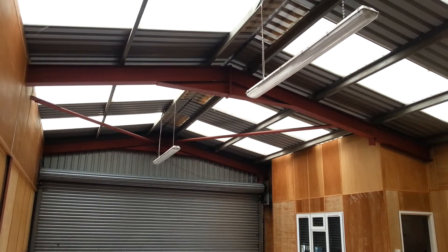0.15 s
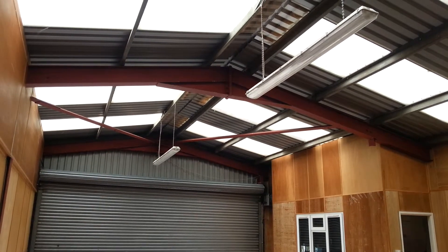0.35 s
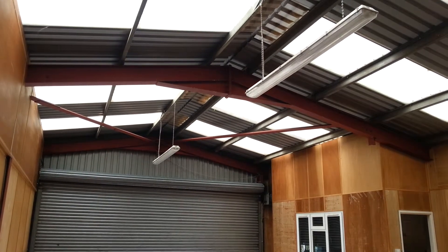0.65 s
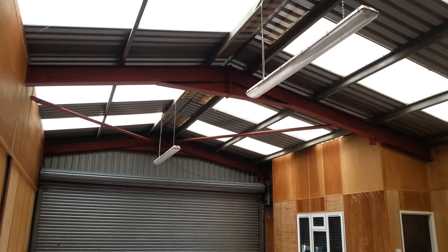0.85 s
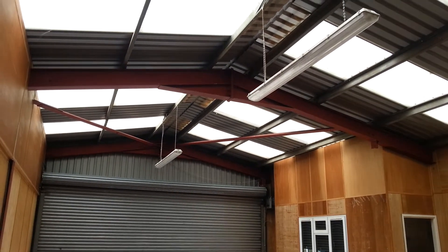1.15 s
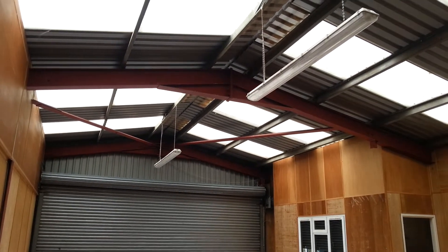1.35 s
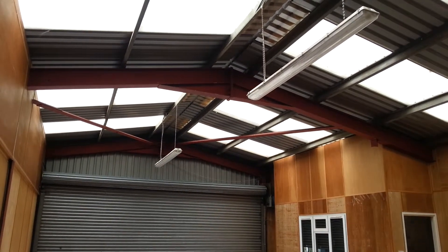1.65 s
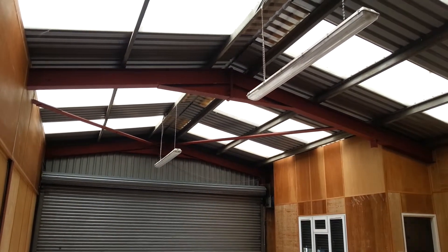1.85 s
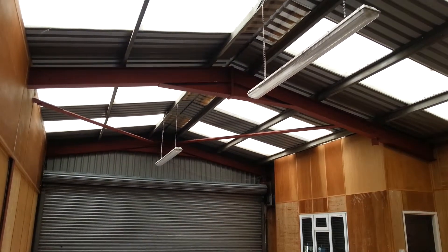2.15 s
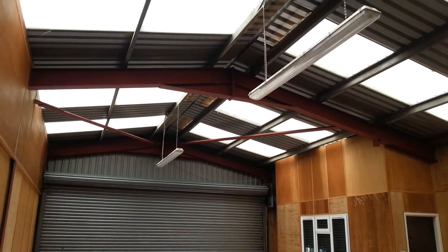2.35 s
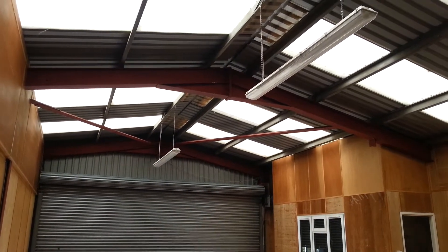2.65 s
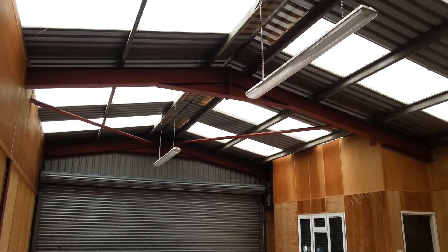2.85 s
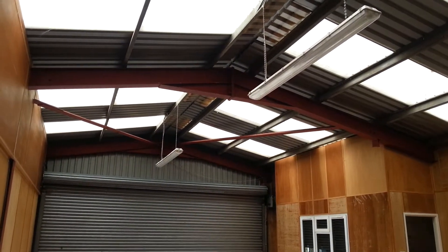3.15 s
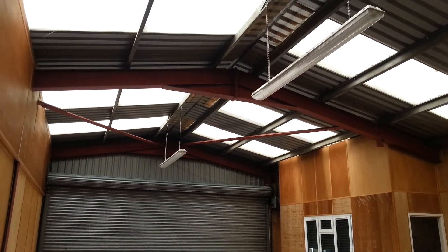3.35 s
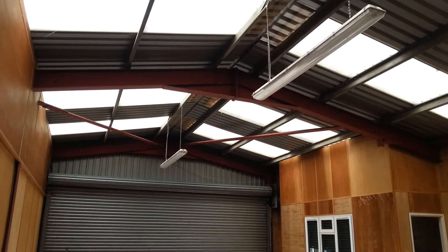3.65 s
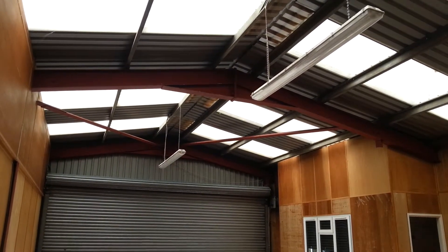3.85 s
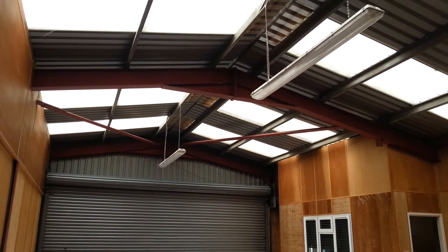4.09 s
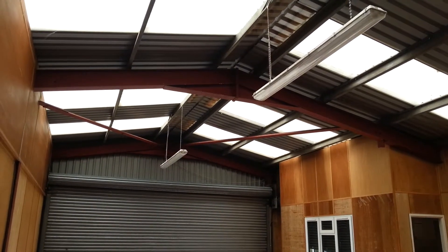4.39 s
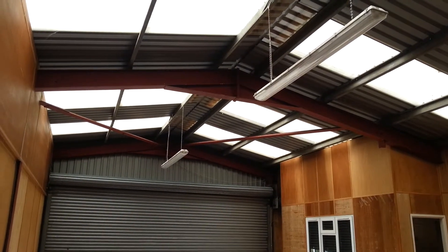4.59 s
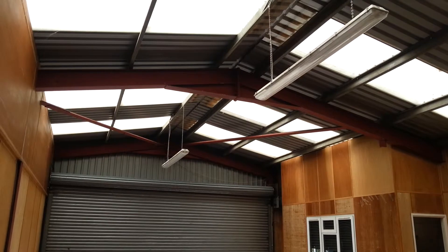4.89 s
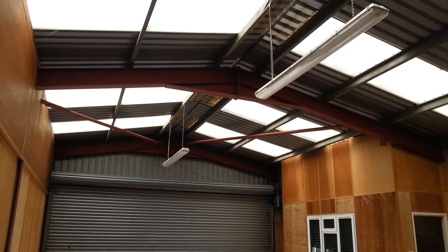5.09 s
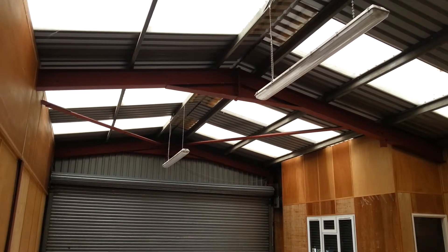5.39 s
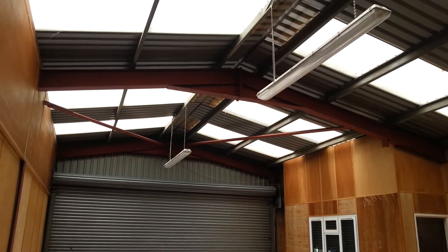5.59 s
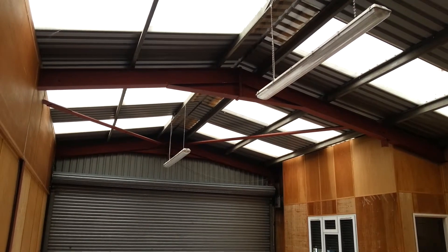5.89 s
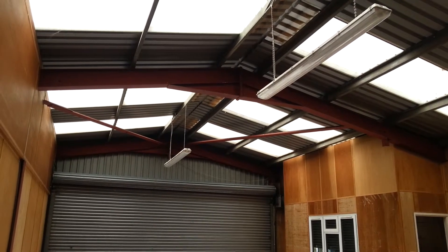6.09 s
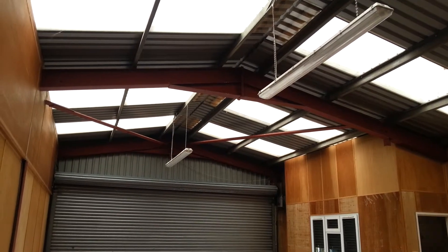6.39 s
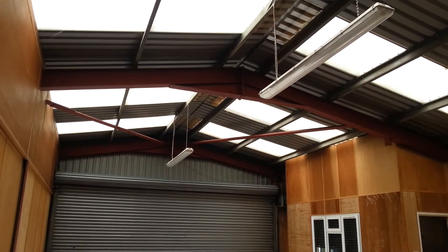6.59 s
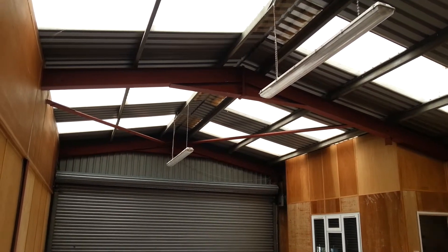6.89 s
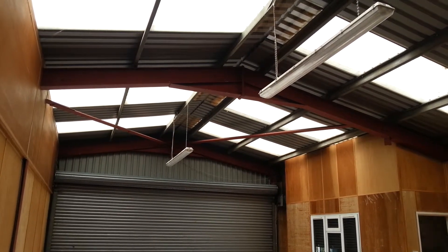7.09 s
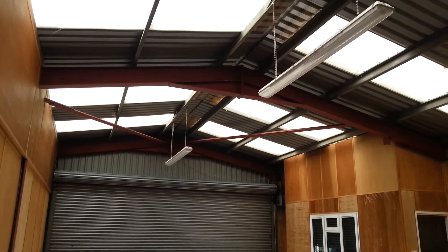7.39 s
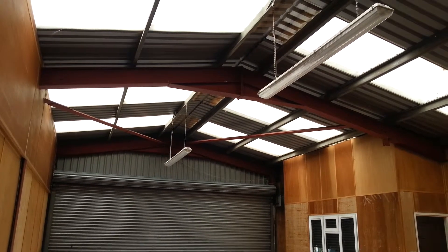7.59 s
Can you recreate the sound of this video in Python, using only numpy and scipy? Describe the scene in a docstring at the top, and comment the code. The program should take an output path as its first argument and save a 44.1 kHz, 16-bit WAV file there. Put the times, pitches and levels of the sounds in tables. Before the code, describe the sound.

Inside a large, empty steel and timber shed, a steady bed of faint distant rumble and microphone hiss runs throughout. From 0 to about 3.4 seconds a nearby swallow-like bird twitters quickly: tiny sliding whistles and scooped chirps, mostly 3 to 6 kHz, strongest from about 1.3 to 2.3 seconds, blurred into a long shimmer by the hall. At about 2.5 seconds the sheet roof gives a quiet dull knock, and again at 3.9. After a short lull, a softer song begins near 3.75, pauses briefly, then builds from 4.6 to 5.8 with regular pulses, high rising flicks over lower held notes, loudest around 5.1 to 5.5. A thin, wavering far whistle, mostly echo, sits behind it from 4.6 to 5.4. After another gap, a weaker song runs from 6.3 to the end near 7.7 seconds, becoming sparse and gentle.

```python
"""Songbirds twitter, swallow-like, in the roof of a large empty shed, over distant rumble and microphone hiss.
A near song opens the scene: short sliding whistles, near-sines smeared into a long shimmer by the hall.
During and after it the sheet roof knocks twice, each knock a coloured, decaying noise burst.
Two softer songs follow, pairing an upper voice of rising flicks with a lower voice of held notes.
Among them a far bird whistles outside: a thin wavering tone heard mostly as echo."""
import sys
import numpy as np
from scipy import signal
from scipy.fft import rfft, irfft
from scipy.io import wavfile
from scipy.ndimage import uniform_filter1d

SR = 44100
rng = np.random.default_rng(int(sys.argv[2]) if len(sys.argv) > 2 else 0)


def materialize(psi):
    """Save the field psi as 16-bit PCM at rate SR to the path in sys.argv[1].

    A 1-D psi becomes a single channel; in a 2-D psi each row is a channel.
    """
    bounded = np.clip(np.atleast_2d(psi).T, -1, 1)
    quanta = np.round(bounded * 32767).astype(np.int16)
    wavfile.write(sys.argv[1], SR, quanta)


N = 341334


def gain_of(db):
    """Level law: amplitude is ten to the power of decibels over twenty."""
    return 10 ** (np.asarray(db) / 20)


def evened(x):
    """Power normalisation: scales a signal to rms 1."""
    return x / np.sqrt(np.mean(x ** 2) + 1e-20)


def read(points, hz):
    """Logarithmic pitch scale: interpolates a table along log frequency."""
    table_hz, value = np.transpose(points)
    return np.interp(np.log(hz + 1), np.log(table_hz + 1), value)


def add(mix, s, sound):
    """Superposition: adds a sound to the mix from time s, in seconds."""
    part = mix[..., max(round(s * SR), 0):][..., :sound.shape[-1]]
    part += sound[..., :part.shape[-1]]


def wander(count, smooth):
    """Low-passed noise: two running means over `smooth` samples leave a slow fluctuation of rms 1."""
    size = max(int(smooth), 2)
    noise = rng.standard_normal(count)
    return evened(uniform_filter1d(uniform_filter1d(noise, size), size))


# Spectrum of the rumble and hiss. Each row: frequency in Hz, relative level in dB per Hz.
AIR_SPECTRUM = [(21, -48), (45, -7.5), (109, -15), (185, -1.5), (356, 0), (561, -2.5), (778, 0.5),
                (1030, -3), (2080, -10), (3110, -9.5), (4660, -7), (6470, -11), (8980, -14), (13400, -15.5),
                (14500, -15)]
# Coherence of the two microphones in the air. Each row: frequency in Hz, left-right likeness (0 to 1).
AIR_COHERENCE = [(50, 0.12), (300, 0.6), (1000, 0.15), (4000, 0.014)]
AIR_DB = -50.5  # before a small lift for each side


def air():
    """Diffuse background noise: random short-time spectra, partly coherent, with faint drifting patches."""
    frames, hz = N // 256 + 5, np.fft.rfftfreq(1024, 1 / SR)
    a, b, c, d, patches = rng.standard_normal((frames, 513, 5)).T
    patches = evened(uniform_filter1d(uniform_filter1d(patches, 12, 0), 20, 1))
    swell_db = 0.4 * wander(frames, 60)
    likeness = np.clip(read(AIR_COHERENCE, hz), -1, 1)[:, None]
    left = a + 1j * b
    right = likeness * left + np.sqrt(1 - likeness ** 2) * (c + 1j * d)
    spectra = np.array([left, right])
    spectra *= gain_of(read(AIR_SPECTRUM, hz)[:, None] + 1.58 * patches + swell_db)
    noise = signal.istft(spectra, nperseg=1024, noverlap=768)[1][:, :N]
    return gain_of([[AIR_DB + 0.5], [AIR_DB + 2.5]]) * evened(noise)


# Straight slides, mostly of the near song.
# Each row: start in seconds, length in seconds, start pitch in Hz, end pitch in Hz, level in dB.
SLIDES = [(0.0, 0.0031, 3680, 5580, -30), (.139, 0.027, 4230, 6140, -32.5), (.235, 0.031, 3740, 6040, -33),
          (.328, 0.012, 5770, 5010, -31), (.353, 0.013, 5300, 5980, -24.5),
          (.418, 0.037, 5050, 4760, -34.5), (.456, 0.025, 3265, 4740, -29),
          (.471, 0.0056, 5100, 5730, -22.5), (.474, 0.01, 6370, 6620, -36.5),
          (.478, 0.0095, 4490, 4840, -21.5), (.548, 0.031, 4230, 4575, -23),
          (.566, 0.0046, 4840, 7700, -30.5), (.684, 0.042, 3390, 3720, -42.5),
          (.722, 0.012, 3424, 4590, -24.5), (.732, 0.012, 4900, 5670, -26), (.79, .03, 3860, 4420, -31.5),
          (.8, 0.017, 5320, 5400, -30), (.822, 0.0084, 5400, 7380, -34), (.856, 0.01, 5030, 4760, -28),
          (.874, 0.026, 4264, 4266, -32), (1.078, 0.0407, 4300, 3726, -35),
          (1.118, 0.022, 3400, 4596, -26.5), (1.186, 0.039, 4750, 4920, -34.5),
          (1.216, 0.015, 5060, 5555, -24), (1.338, 0.027, 3233, 5500, -23.5),
          (1.36, 0.0091, 5580, 5460, -15.5), (1.428, 0.029, 4680, 5056, -22),
          (1.444, 0.017, 4914, 5580, -17.5), (1.688, .02, 3654, 4800, -18.5), (1.7, 0.017, 4668, 4690, -18),
          (1.79, .008, 4320, 4600, -22.5), (1.856, .031, 3170, 3800, -36),
          (1.872, 0.0095, 2450, 2630, -32.5), (1.91, 0.014, 4820, 5180, -36.5),
          (1.986, 0.019, 3420, 4090, -33.5), (2.012, 0.036, 3895, 4550, -27),
          (2.04, 0.014, 4550, 4910, -23.5), (2.139, 0.023, 3564, 3754, -26.5),
          (2.157, .016, 3686, 4785, -16), (2.164, 0.017, 4570, 4605, -17), (2.198, 0.026, 4860, 5230, -24),
          (2.252, 0.0091, 1810, 2630, -31.5), (2.328, 0.031, 3875, 4960, -32),
          (2.352, 0.0075, 3360, 3676, -20.5), (2.556, 0.015, 3310, 3360, -34),
          (2.57, 0.015, 4330, 4310, -31), (2.596, 0.024, 4330, 5030, -28.5),
          (2.606, 0.012, 4780, 5300, -32), (2.684, 0.019, 2940, 3100, -41),
          (2.706, 0.0083, 3170, 3570, -30.5), (2.72, 0.022, 4364, 4465, -24.5),
          (2.722, 0.011, 2130, 2290, -41), (2.735, 0.012, 4880, 7100, -29), (2.737, 0.014, 3000, 3200, -39),
          (2.745, 0.013, 6150, 6450, -50), (2.785, 0.014, 4090, 3520, -30), (2.79, .034, 4950, 4360, -30),
          (2.836, .018, 2842, 4510, -25), (2.846, 0.0068, 5250, 4950, -30.5),
          (2.994, 0.024, 3003, 4110, -31), (3.013, .0064, 4650, 4370, -26), (3.014, 0.024, 4156, 3820, -25),
          (3.03, 0.022, 4320, 5320, -27), (3.178, 0.023, 1990, 2650, -41.5),
          (3.18, 0.041, 3750, 5060, -34.5), (3.208, 0.017, 4940, 5730, -40),
          (3.246, 0.02, 3800, 4200, -27.5), (3.258, .02, 4110, 3794, -23), (3.252, .004, 3030, 3330, -29),
          (3.34, 0.0092, 3550, 3350, -43), (3.355, 0.029, 5850, 5500, -34), (3.374, 0.02, 2800, 2840, -41),
          (3.384, 0.017, 2200, 2760, -41), (3.388, 0.033, 4550, 5350, -31.5),
          (3.408, 0.014, 5860, 6500, -39.5), (3.41, 0.01, 2890, 3780, -34.5),
          (3.411, 0.0046, 6800, 7650, -38), (3.42, 0.018, 5110, 4310, -31),
          (3.898, 0.0085, 5340, 5700, -43), (4.681, .014, 5200, 5800, -57), (4.973, 0.023, 5400, 4370, -40),
          (5.232, 0.014, 4250, 6640, -30), (6.298, 0.028, 5500, 5930, -54), (6.391, .013, 5200, 5800, -52),
          (6.447, 0.025, 5350, 4580, -45), (6.563, 0.0099, 5200, 5440, -45), (7.595, .027, 5200, 4700, -51),
          (7.718, 0.012, 4930, 5020, -44), (7.731, 0.011, 3900, 4100, -36)]
# Hooks of the near song, scooping up to a held pitch.
# Each row: start in seconds, length in seconds, held pitch in Hz, level in dB.
HOOKS = [(0.252, 0.038, 4410, -35), (0.572, 0.015, 5120, -18.5), (0.817, 0.015, 4920, -17.5),
         (1.12, 0.01, 5390, -37), (1.223, 0.014, 4200, -30.5), (1.362, 0.0083, 3970, -24.5),
         (1.45, 0.012, 4420, -22.5), (1.519, 0.0036, 3774, -21), (1.547, 0.0067, 3724, -19.5),
         (1.728, 0.0097, 4094, -15), (1.729, 0.017, 5155, -19), (1.78, 0.023, 3550, -28.5),
         (1.885, 0.0045, 3330, -21), (2.042, .014, 3677, -19), (2.195, 0.011, 4038, -15),
         (2.267, 0.0097, 3542, -20.5), (2.579, 0.032, 4054, -25.5), (2.804, 0.015, 4144, -22.5),
         (3.173, 0.0243, 3453, -32), (3.274, .012, 4570, -21.5)]
SLIDE_MIDWAY = 0.55  # share of the slide done at half length
HOOK_SCOOP, HOOK_MIDWAY = 0.1675, 0.98  # starts this share below the held pitch; share reached at half length


def near_song():
    """Frequency modulation: slides move between two pitches, hooks scoop up and level off."""
    notes = []
    for s, length, start_hz, end_hz, db in SLIDES:
        middle_hz = start_hz + SLIDE_MIDWAY * (end_hz - start_hz)
        notes.append((s, 1, length, start_hz, middle_hz, end_hz, db))
    for s, length, held_hz, db in HOOKS:
        notes.append((s, 1, length, held_hz * (1 - HOOK_SCOOP), held_hz * HOOK_MIDWAY, held_hz, db))
    return notes


def song():
    """Succession: all notes in order as (s, rasp, length s, start Hz, middle Hz, end Hz, level dB)."""
    return sorted(near_song() + upper_voice() + lower_voice())


SWELL = 1.22  # over 1: a note peaks late and stops short


def note(length, start_hz, middle_hz, end_hz, level_db, rasp):
    """Syrinx oscillation: a sliding near-sine with a faint octave, fluttering a little in level and pitch."""
    u = np.arange(round(length * SR)) / (length * SR)
    # parabola through the start, middle and end pitches
    hz = start_hz * (1 - u) * (1 - 2 * u) + middle_hz * 4 * u * (1 - u) + end_hz * u * (2 * u - 1)
    phase = 2 * np.pi * np.cumsum(hz * (1 + 0.003 * rasp[:len(u)])) / SR
    tone = np.sin(phase) + gain_of(-47.0) * np.sin(2 * phase)
    flutter_db = np.minimum(2.2 * rasp[::-1][:len(u)], 4)
    envelope = np.sin(np.pi * u ** SWELL) ** 0.6
    return gain_of(level_db + flutter_db) * tone * envelope


def sum_tones(voices, level_db=-27.5, low_hz=7070.0):
    """Quadratic intermodulation: voices together shake each other and add a faint tone at their summed pitch."""
    power = uniform_filter1d(voices ** 2, size=200)
    mixed = voices ** 2 / np.sqrt(np.abs(power) + 1e-9)  # keeps the level in proportion to the voices
    high_pass = signal.butter(6, low_hz, "high", fs=SR, output="sos")
    return gain_of(level_db) * signal.sosfilt(high_pass, mixed)


# Reverberation of the steel and timber hall. Each row: frequency in Hz, 60 dB decay time in seconds.
HALL_DECAY = [(300, 0.4), (2000, 0.78), (4000, 0.81), (6500, 0.5), (12000, 0.94)]


def hall(x, near_s=0.0094, early_db=6.0, delay_s=0.002):
    """Reverberation: sparse reflections of random sign, stronger at first, each band dying at its own speed."""
    taps = np.zeros((2, SR))
    # one reflection at a random place in every 20 samples, for each ear
    at = np.arange(0, SR - 20, 20) + rng.integers(0, 20, (2, (SR - 1) // 20))
    np.put_along_axis(taps, at, rng.choice([-1., 1.], at.shape), 1)
    hz, t, z = signal.stft(taps, SR, nperseg=256)
    decay_db = -60 * t / read(HALL_DECAY, hz)[:, None] + early_db * np.exp(-t / near_s)
    tail = signal.istft(z * gain_of(decay_db), SR, nperseg=256)[1]
    tail = np.pad(tail, ((0, 0), (int(delay_s * SR), 0)))
    return signal.fftconvolve(x[None], tail / np.linalg.norm(tail[0]), axes=1)[:, :N]


# Echoes of each note from the nearest roof sheets and beams.
# Each row: left delay in seconds, right delay in seconds, level in dB.
NEAR_ECHOES = [(.0042, .0031, -6), (0.0119, .0098, -11.5)]


def near_echoes(direct):
    """Specular reflection: delayed, weaker copies reach each ear after its own path."""
    echoes = np.zeros_like(direct)
    for *delays, db in NEAR_ECHOES:
        copies = [np.roll(ear, int(delay * SR)) for ear, delay in zip(direct, delays)]
        echoes += gain_of(db) * np.array(copies)
    return echoes


# Direct sound of the birds at the two microphones.
# Each row: frequency in Hz, level at the left above the right in dB.
DIRECT_SIDE = [(2500, -3), (3600, 11.5), (4400, -4.5), (5300, -3.5), (6300, -9.5)]
FLICKS_PER_NOTE = 2


def birds(wet_db=3.5, scratch_db=-20.5, grace_db=-16.0):
    """Direct and reverberant fields: successive notes take turns among four different hall echoes."""
    direct = np.zeros((2, N))
    sends = np.zeros((4, N))  # one for each hall echo
    rasp, scratch = wander(N, 42), wander(N, 9.64)
    notes = song()
    chance = rng.uniform(-1.2, 1, (len(notes), FLICKS_PER_NOTE, 3))
    for k, (s, rough, *shape) in enumerate(notes):
        _, _, middle_hz, _, level_db = shape
        at = round(s * SR) // 2  # where to read the random flutter
        sound = note(*shape, rough * rasp[at:][:4000])
        # turbulent air spreads a haze round the pitch
        sound = sound * (1 + gain_of(scratch_db) * scratch[at:][:len(sound)])
        side_db = read(DIRECT_SIDE, middle_hz)
        add(direct, s, sound * gain_of([[side_db / 2], [-side_db / 2]]))
        add(sends[k % 4], s, sound)
        # faint quick flicks at random times and pitches near each note, heard only through the hall
        for shift, pitch, slide in chance[k]:
            hz = np.clip(middle_hz * (1 + 0.2 * pitch), 2900, 6200)
            start_hz, end_hz = hz * (1 - 0.1 * slide), hz * (1 + 0.073 * slide)
            flick = note(0.0118, start_hz, hz, end_hz, level_db + grace_db, rasp[at:][:4000])
            add(sends[(k + 1) % 4], s + 0.035 * shift, flick)
    high = sum_tones(sends.sum(0))
    direct += high
    sends[0] += high
    direct[1] = np.roll(direct[1], 9)  # the right side follows 9 samples later
    reverberant = sum(hall(send) for send in sends)
    wet_gain = gain_of([[wet_db + 0.43], [wet_db + 2.5]])
    return direct + near_echoes(direct) + wet_gain * reverberant


# Dull knocks of the roof sheets. Each row: start in seconds, level in dB.
KNOCKS = [(2.455, -47.5), (3.896, -45)]
# Spectrum of a knock. Each row: frequency in Hz, relative level in dB per Hz.
KNOCK_COLOUR = [(120, -56), (200, -22.5), (672, -8.5), (815, -19.5), (1090, -10), (1610, -22),
                (2110, -18.5), (3000, -26.5), (3900, -22), (6600, -120)]


def knocks():
    """Impact excitation: short coloured noise bursts die away exponentially, with the hall behind them."""
    t, out = np.arange(4096) / SR, np.zeros(N)
    colour = gain_of(read(KNOCK_COLOUR, np.fft.rfftfreq(4096, 1 / SR)))
    for s, db in KNOCKS:
        burst = irfft(rfft(rng.standard_normal(4096)) * colour)
        decay = gain_of(db - 60 * t / 0.41)  # 60 dB in 0.41 s
        attack = np.minimum(t / 0.00043, 1)
        add(out, s, decay * evened(burst) * attack)
    return 1.3 * out + 1.6 * hall(out)


# Upper voice of the soft songs, a quiet sinking lead-in and a rising flick.
# Each row: flick start in seconds, flick length in seconds, dip pitch in Hz, top pitch in Hz,
# flick level in dB, lead-in level in dB.
UPPER = [(3.756, .04, 6240, 6800, -54, -60), (3.881, .03, 5830, 6650, -42, -49.5),
         (4.585, 0.04, 6030, 6090, -53, -72), (4.716, .03, 6070, 6480, -46, -55),
         (4.85, 0.021, 5920, 6410, -34.5, -52.5), (4.953, 0.049, 5830, 6560, -36, -54),
         (5.108, 0.011, 5710, 6540, -26, -39.5), (5.232, 0.01, 5920, 6820, -27, -41),
         (5.364, 0.0062, 5580, 6550, -26, -35.5), (5.488, 0.012, 5720, 6440, -28, -38.5),
         (5.609, 0.012, 5650, 6360, -29.5, -43), (5.737, .019, 5670, 6150, -31.5, -45),
         (6.442, .032, 5950, 6750, -41.5, -49), (6.576, .012, 5720, 6510, -32, -45),
         (6.709, 0.021, 5840, 6310, -35.5, -45), (6.836, 0.0166, 5980, 6150, -38, -46.5),
         (6.969, 0.016, 5960, 6000, -51, -40), (7.269, .019, 5840, 6000, -54, -44.5),
         (7.6, 0.017, 5450, 5940, -51, -60), (7.721, 0.013, 5600, 6330, -40.5, -50)]
LEAD_RASP = 1.83  # lead-ins of both voices flutter this many times more than full notes
SINK_S, SINK_START, SINK_MIDDLE = 0.045, 1.07, 1.01  # lead-in length in s; its pitches as shares of the dip
FLICK_MIDWAY = 0.561  # share of the flick done at half length


def upper_voice():
    """Pitch glide: each lead-in sinks to the dip, from which the flick rises to its top."""
    notes = []
    for s, length, dip, top, db, lead_db in UPPER:
        notes.append((s - SINK_S, LEAD_RASP, SINK_S, SINK_START * dip, SINK_MIDDLE * dip, dip, lead_db))
        notes.append((s, 1, length, dip, dip + FLICK_MIDWAY * (top - dip), top, db))
    return notes


# Lower voice of the soft songs, a quiet lead-in, mostly climbing, and a held note.
# Each row: held start in seconds, held length in seconds, lead-in pitch in Hz, held pitch in Hz,
# held level in dB, lead-in level in dB.
LOWER = [(3.763, 0.017, 4310, 4820, -44.5, -51.5), (3.899, 0.015, 4050, 4710, -35, -46),
         (4.619, 0.043, 4760, 4845, -39, -65), (4.754, 0.014, 4150, 4640, -38.5, -49),
         (4.844, 0.023, 4030, 4350, -48, -50), (4.989, 0.025, 4200, 4710, -34, -50),
         (5.117, .017, 4300, 4980, -30.5, -44), (5.229, 0.022, 4440, 5090, -23, -40.5),
         (5.368, 0.01, 4215, 4715, -26.5, -38), (5.497, 0.014, 4110, 4766, -29.5, -39),
         (5.619, 0.016, 3980, 4657, -29, -49), (5.759, 0.024, 4130, 4660, -35, -37.5),
         (6.332, 0.025, 4760, 4740, -40, -71), (6.462, 0.021, 4060, 4444, -33, -45.5),
         (6.701, 0.014, 3900, 4320, -49, -52), (6.84, 0.021, 4100, 4370, -34, -45),
         (6.959, 0.016, 3960, 4280, -53, -53), (7.132, .028, 3880, 4246, -38, -47),
         (7.252, 0.055, 4150, 4346, -40, -49), (7.423, .012, 5200, 5310, -41.5, -69),
         (7.46, 0.027, 4040, 4376, -33, -71), (7.608, 0.039, 3800, 4170, -40, -55),
         (7.717, .015, 4000, 4400, -36, -54)]
CLIMB_S, CLIMB_MIDWAY, CLIMB_END = 0.04, 0.239, 1  # lead-in length in s; shares of the climb done
HELD_START = 0.975  # share of the held pitch at the onset


def lower_voice():
    """Glide to a steady tone: each lead-in moves to the held pitch, where the full note settles."""
    notes = []
    for s, length, low, held, db, lead_db in LOWER:
        climb = held - low
        middle_hz, end_hz = low + CLIMB_MIDWAY * climb, low + CLIMB_END * climb
        notes.append((s - CLIMB_S, LEAD_RASP, CLIMB_S, low, middle_hz, end_hz, lead_db))
        notes.append((s, 1, length, HELD_START * held, held, held, db))
    return notes


# A far bird's held whistle. Each row: time in seconds, pitch in Hz, level in dB before the direct and hall gains.
WHISTLE = [(4.629, 2690, -54), (4.72, 2594, -51), (4.88, 2590, -51), (5.001, 2590, -49),
           (5.041, 2365, -57.5), (5.15, 2440, -58.5), (5.4, 2300, -60)]


def whistle():
    """Distant source: a thin unsteady tone in which the reverberant sound outweighs the direct."""
    s, hz, db = np.transpose(WHISTLE)
    t = np.arange(s[0], s[-1], 1 / SR)
    phase = 2 * np.pi * np.cumsum(np.interp(t, s, hz)) / SR
    tone = np.sin(phase) * signal.windows.tukey(len(t), 0.1)
    waver_db = 4.5 * wander(len(t), 400)
    out = np.zeros(N)
    add(out, s[0], tone * gain_of(np.interp(t, s, db) + waver_db))
    return 0.31 * out + 0.76 * hall(out)


def scene():
    """Superposition: birds, far whistle, knocks and air add up at the two microphones."""
    return birds() + whistle() + knocks() + air()


EDGE_HZ = 14580  # upper band limit


def record(dry):
    """Nonlinear distortion: loud notes are bent a little and carry a brief broadband fizz; then the band limit."""
    # difference tones between notes, without the deep bass
    squared = dry ** 2 - uniform_filter1d(dry ** 2, size=120)
    bent = dry + 0.2 * squared - 0.26 * dry ** 3
    loudness = np.abs(uniform_filter1d(dry ** 2, 300)) ** 0.64
    hz, t, z = signal.stft(rng.standard_normal(dry.shape), SR, nperseg=256)
    patches = rng.standard_normal(z.shape[1:])
    patches = evened(uniform_filter1d(uniform_filter1d(patches, 5, 0), 4, 1))
    # the fizz comes in blotches and lacks bass
    z *= gain_of(2.6 * patches) * (hz / (hz + 130.0))[:, None]
    grain = signal.istft(z, SR, nperseg=256)[1][:, :N]
    fizz = gain_of(-23.5) * loudness * grain
    low_pass = signal.firwin(511, EDGE_HZ, window=("kaiser", 9), fs=SR)
    return signal.oaconvolve(bent + fizz, low_pass[None], "same")


dry = scene()
out = record(dry)
materialize(out)
```